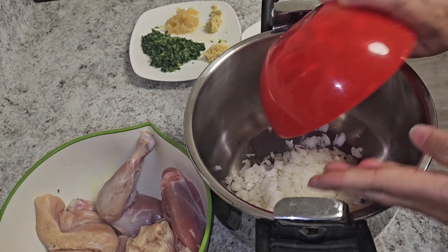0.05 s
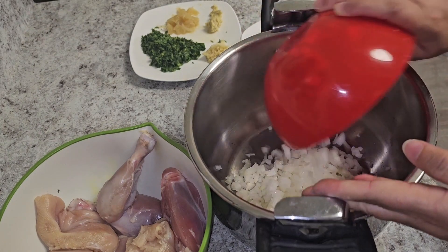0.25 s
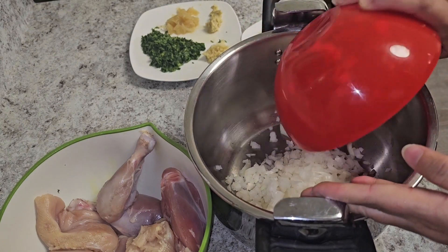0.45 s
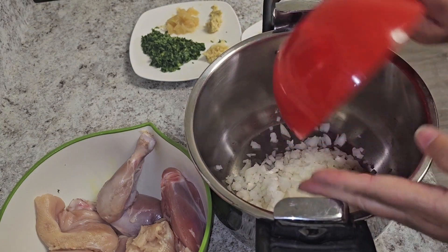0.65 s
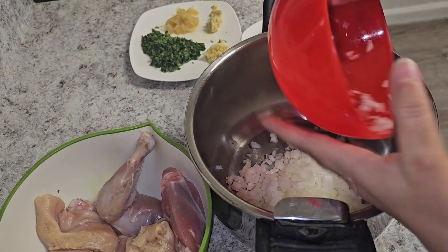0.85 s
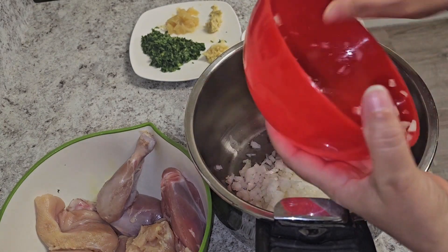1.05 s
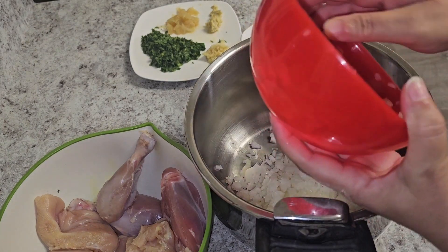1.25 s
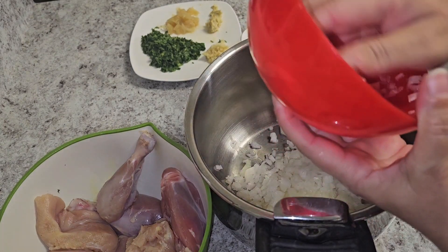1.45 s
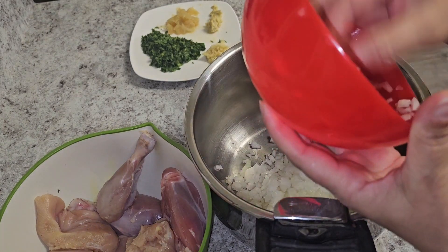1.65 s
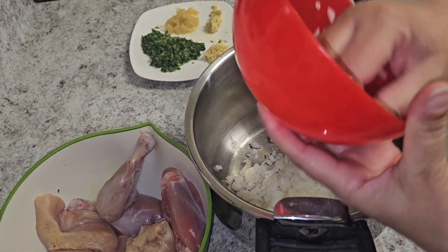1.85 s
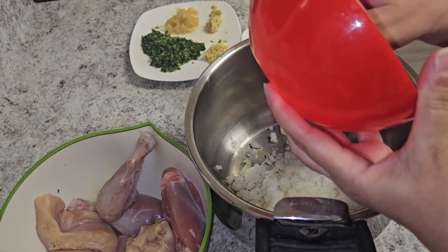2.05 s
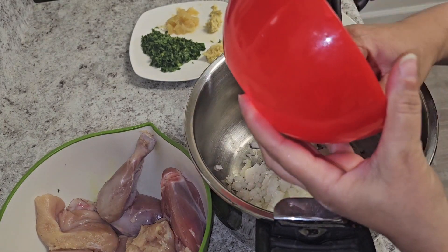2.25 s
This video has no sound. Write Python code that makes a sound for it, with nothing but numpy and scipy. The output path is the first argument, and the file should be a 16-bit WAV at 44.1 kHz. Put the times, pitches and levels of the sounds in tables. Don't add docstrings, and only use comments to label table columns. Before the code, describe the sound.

A plastic bowl knocks sharply on a steel pot rim, then fingers scrape out the last pieces

```python
import sys
import numpy as np
from scipy import signal
from scipy.fft import rfft, irfft
from scipy.io import wavfile

SR = 44100
rng = np.random.default_rng(int(sys.argv[2]) if len(sys.argv) > 2 else 0)


def put_to_file(sound):
    columns = np.atleast_2d(sound).T
    safe = np.clip(columns, -1, 1)
    whole_steps = np.round(safe * 32767)
    wavfile.write(sys.argv[1], SR, whole_steps.astype(np.int16))


def invert_db(x):
    u = np.asarray(x, float) / 20
    return 10 ** u


N = 101429
T = np.arange(N) / SR
HZ = np.fft.rfftfreq(2 ** 17, 1 / SR) + 1

# f/Hz, density/dB
KITCHEN_SPECTRUM = [(20, -11.5), (77, -5.5), (250, -14), (816, -21), (1050, -26), (9800, -34.5),
                    (10800, -42), (16000, -42.5)]
# f/Hz, width/Hz, level/dB rms
FRIDGE_HUM = [(117.5, 11, -56.5), (461, 7.8, -74), (804, 11, -69.5)]
# t/s, level/dB
WORKTOP_SHAKE = [(0.0, -47), (0.11, -63), (0.16, -44.5), (0.28, -43.5), (0.33, -38), (0.43, -44),
                 (0.46, -32), (0.69, -34), (0.82, -56), (1.5, -49), (1.54, -55), (1.71, -50), (1.8, -69),
                 (1.92, -46.5), (2.0, -66.5), (2.3, -58.5)]
# t/s, crack/dB, thud/dB re crack, boom/dB re crack
KNOCKS = [
    (0.042, -30, -13, -17),
    (0.14, -16, -13.5, -21),
    (0.297, -13, -14, -22),
    (0.446, -13.5, -13.5, -20.5),
    (0.582, -9.5, -15.5, -20.5),
]
# f/Hz, density/dB
CRACK_SPECTRUM = [(530, -23), (900, -5), (1220, -8.5), (2330, -10), (3150, -5), (6390, -12.5), (7760, -9.5),
                  (15300, -16.5), (16500, -21)]
# f/Hz, level/dB, t60/s
BOWL_MODES = [(1540, -5.5, 0.034), (1738, -8.5, 0.13), (3000, -3, 0.044), (3145, -1.5, 0.075),
              (3510, 2, 0.023), (4220, 1.5, 0.012), (5000, -2, 0.011), (5860, -9, 0.049), (7680, 1, 0.084),
              (9500, -6, 0.025), (12000, -15, .02)]
# f/Hz, level/dB, t60/s
POT_MODES = [(230, -0.5, 0.08), (273.6, 1.5, 0.078), (349.8, -4.5, 0.26), (403.7, 0, 0.12), (539, -1, .07),
             (594, -12, 0.091), (681.5, -9.5, 0.32), (721.5, -7.5, 0.51), (895.5, -5.5, 0.19),
             (930, 0.5, 0.074), (1032, -6, 0.067)]
# f/Hz, level/dB, t60/s
WORKTOP_MODES = [(99.2, -3.5, 0.39), (133.5, -3, 0.32), (161, -3.5, 0.26), (198.5, 0.5, 0.19)]
# f/Hz, level/dB, t60/s
BASE_FLEX = [
    (302, -37.5, 0.055),
    (255.3, -23.5, 0.13),
    (187, -26, 0.16),
    (200.2, -18, 0.14),
    (242, -26.5, 0.12),
]
# t/s, level/dB
BUMPS = [
    (.045, -37),
    (0.684, -39),
    (1.019, -52.5),
    (1.28, -43.5),
    (1.43, -54),
    (1.89, -45),
    (2.09, -48),
]
# t/s, tick/dB, hollow/dB re tick, wall/dB re tick
TAPS = [(0.7247, -42, -5, -7), (0.8754, -54, -16.5, -6), (1.058, -50, -10, -8),
        (1.2822, -45.5, -7.5, -13.5), (1.5414, -38.5, -25, -29), (1.5698, -41, -13, -0.5),
        (1.7112, -67, 5.5, 18), (1.7885, -35, -8.5, -7), (1.8557, -36.5, -18, -28),
        (1.8859, -29.5, -11.5, -11), (2.0803, -37.5, -10, -28), (2.217, -43.5, -3, -2),
        (2.2501, -29, -14.5, -11.5)]
# f/Hz, level/dB, t60/s
WALL_MODES = [(950, -1, 0.016), (1340, 3, 0.015), (1910, -2, 0.014)]
# f/Hz, level/dB, t60/s
HOLLOW_MODES = [(140, -2, .06), (250, -1.5, 0.055), (488, -4, 0.058), (712, 2.5, 0.046), (812, 7.5, 0.09),
                (890, -9, 0.056)]
# f/Hz, density/dB
SKIN_SPECTRUM = [(1500, -49), (2500, -18), (3200, 1.5), (4500, -1), (6500, -7), (9500, -9.5), (11000, -10),
                 (16000, -14)]
# start t/s, rise/s, fall/s, rub/dB, squeak/dB re rub
STROKES = [
    (.98, 0.053, .03, -64.5, -4),
    (1.24, 0.06, .02, -64, -7),
    (1.36, 0.07, 0.16, -56, -10.5),
    (1.47, 0.15, 0.055, -60, -3),
    (1.849, 0.013, 0.078, -49.5, -25),
    (1.876, 0.038, 0.021, -54.5, 4),
    (2.077, 0.0036, 0.045, -53, -9.5),
    (2.10, .11, 0.046, -52.5, 1),
    (2.24, 0.013, 0.076, -57, -3),
]
# f/Hz, t60/s
ROOM_DECAY = [(60, 0.62), (250, 0.49), (1000, 0.29), (4000, 0.35), (12000, 0.29)]
# f/Hz, left re right/dB, unlike share/0-1
STEREO = [(59, 2.5, 0.1), (298, 2, 0.37), (710, 3.2, 0.84), (2400, 2, 0.97), (5000, 6, .95),
          (9400, 2.7, 0.89), (14400, 6.5, 0.83)]

KITCHEN_DB = -53
SHAKE_HZ, SHAKE_DB = 60.1, -0.5
CRACK_S, CRACK_DB, RATTLE_S, RATTLE_DB = 0.00043, 2, 0.0033, -20
THUD_S, THUD_DB, BOOM_S, BOOM_DB = 0.00042, 5.5, 0.0014, 9.5
THUMP_HZ, THUMP_DB, THUMP_S = 218, 1.5, 0.032
RING_DB, FLEX_RISE_S, LATE_S = -6.5, 0.006, 0.0007
PUSH_SCATTER = 0.2
TICK_S, TICK_DB, HOLLOW_DB, WALL_DB = 0.0008, 4, 7.5, 9
SLIPS_PER_S, SLIP_DB, SQUEAK_HZ = 9000, 2.2, 1510
DIRECT_DB, BODY_SEND_DB, EARLY_S, TAIL_RISE_S = -1.5, -11, 0.0043, 0.0043
KNOCK_TAIL_DB, KNOCK_EARLY_DB = 3.5, 5
FINGER_TAIL_DB, FINGER_EARLY_DB = -4.5, -10
TOP_HZ = 15900


def spec(x):
    return rfft(x, 2 * len(HZ) - 2)


def shape(x, g):
    return irfft(spec(x) * g)[..., :N]


def read(table, col=1):
    a = np.array(table, float)
    return np.interp(np.log(HZ), np.log(a[:, 0]), a[:, col])


def colour(x, table):
    g = invert_db(read(table))
    return shape(x, g / np.sqrt(np.mean(g ** 2)))


def band(x, hz, width_hz, order=1):
    g = 1 / (1 + 1j * (HZ - hz ** 2 / HZ) / width_hz) ** order
    return shape(x, g / np.sqrt(np.mean(abs(g) ** 2)))


def ring(x, modes):
    out = 0
    for k, (hz, db, t60_s) in enumerate(modes):
        pole = np.exp(2j * np.pi * hz / SR - np.log(1000) / (t60_s * SR))
        out = out + (-1) ** k * invert_db(db) * signal.lfilter([1], [1, -pole], x + 0j).imag
    return out / np.sqrt(sum(invert_db(2 * mode[1]) for mode in modes))


def decays(times_s, db, decay_s):
    return sum(invert_db(d) * (T >= s) * np.exp(-np.maximum(T - s, 0) / decay_s) for s, d in zip(times_s, db))


def bursts(times_s, db, decay_s):
    return decays(times_s, db, decay_s) * rng.standard_normal(N)


def push(times_s, db, decay_s):
    decay_n = decay_s * SR
    ragged = 1 / decay_n + PUSH_SCATTER * rng.standard_normal(N) / np.sqrt(decay_n)
    return decays(times_s, db, decay_s) * ragged


def walk(rate_hz):
    w = shape(rng.standard_normal(N), 1 / (1 + ((HZ - 1) / rate_hz) ** 2))
    return w / w.std()


def ports(a, b):
    share = np.clip(read(STEREO, col=2), 0, 1)
    tilt = invert_db(read(STEREO) / 2)
    mid, side = spec(a), share * spec(b)
    pair = np.array([(mid + side) * tilt, (mid - side) / tilt])
    return irfft(pair / np.sqrt(1 + share ** 2))[:, :N]


def room(x, body, tail_db, early_db):
    noise = rng.standard_normal((2, 2, N))
    decay = np.array(ROOM_DECAY)
    tail = 0
    for hz in 45 * 2 ** np.arange(9.):
        t60_s = np.interp(np.log(hz), np.log(decay[:, 0]), decay[:, 1])
        octave = np.cos(np.pi / 2 * np.clip(np.log2(HZ / hz), -1, 1)) ** 2
        tail = tail + shape(noise[0], octave) * invert_db(-60 * T / t60_s)
    tail = tail * np.minimum(T / TAIL_RISE_S, 1)
    tail = invert_db(tail_db) * tail / np.sqrt(np.mean(np.sum(tail ** 2, axis=1)))
    early = noise[1] * np.exp(-T / EARLY_S) * invert_db(early_db) / np.sqrt(EARLY_S * SR / 2)
    wet = shape(x + invert_db(BODY_SEND_DB) * body, spec(tail)) + shape(x, spec(early))
    direct = x * invert_db(DIRECT_DB) + body
    near = signal.lfilter([0, 0, .5, -.5, 0, .5, 0, 0, -.5], 1, direct)
    return ports(direct + wet[0], near + wet[1])


def kitchen():
    pair = []
    for _ in range(2):
        x = colour(rng.standard_normal(N), KITCHEN_SPECTRUM) * invert_db(KITCHEN_DB + 1.7 * walk(2.2))
        for hz, width_hz, db in FRIDGE_HUM:
            x = x + invert_db(db + 1.9 * walk(6.9)) * band(rng.standard_normal(N), hz, width_hz)
        pair.append(x)
    return ports(*pair)


def shake():
    s, db = np.array(WORKTOP_SHAKE).T
    phase = 2 * np.pi * np.cumsum(SHAKE_HZ * (1 + 0.09 * walk(9.34))) / SR
    level = invert_db(np.interp(T, s, db) + SHAKE_DB + 2.15 * walk(10))
    return np.sqrt(2) * np.sin(phase) * level


def knocks():
    s, db, thud, boom = np.array(KNOCKS).T
    s = s + LATE_S
    snap = push(s, db + CRACK_DB + 9, CRACK_S / 20)
    rattle = bursts(s, db + RATTLE_DB, RATTLE_S)
    crack = colour(snap + rattle, CRACK_SPECTRUM)
    thump = band(bursts(s, db + thud + THUMP_DB - 2.5, THUMP_S), THUMP_HZ, 417, order=2)
    bowl = ring(push(s, db + RING_DB - 1.5, CRACK_S / 10), BOWL_MODES)
    low = ring(push(s, db + boom + BOOM_DB, BOOM_S), WORKTOP_MODES)
    for at, (hz, flex_db, t60_s) in zip(s, BASE_FLEX):
        age = np.maximum(T - at, 0)
        env = invert_db(flex_db - 60 * age / t60_s) * (1 - np.exp(-age / FLEX_RISE_S))
        low = low + env * np.sin(2 * np.pi * hz * age)
    pot = ring(push(s, db + thud + THUD_DB, THUD_S / 4), POT_MODES)
    return crack, thump + bowl + pot + low


def bumps():
    s, db = np.array(BUMPS).T
    return band(bursts(s, db, 0.011), 210, 253, order=2)


def taps():
    s, db, low, mid = np.array(TAPS).T
    contact = bursts(s, db + TICK_DB - 3, TICK_S) + bursts(s, db - 11, 0.0067)
    tick = colour(contact, SKIN_SPECTRUM)
    wall = ring(push(s, db + mid + WALL_DB - 3.5, 0.0001), WALL_MODES)
    hollow = ring(push(s, db + low + HOLLOW_DB, 0.00012), HOLLOW_MODES)
    return tick, wall + hollow


def rub():
    slips = (rng.random(N) < SLIPS_PER_S / SR) * rng.standard_normal(N)
    slips = slips * invert_db(SLIP_DB * rng.exponential(size=N).clip(max=3))
    slips = slips / slips.std() * invert_db(2.5 * walk(42))
    hiss = squeak = 0
    for s, rise_s, fall_s, db, squeak_db in STROKES:
        swell = np.sin(np.pi / 2 * np.clip((T - s) / rise_s, 0, 1)) ** 2
        fade = np.exp(-(np.maximum(T - s - rise_s, 0) / fall_s) ** 2)
        env = invert_db(db) * swell * fade
        hiss = hiss + env
        squeak = squeak + env * invert_db(squeak_db)
    return colour(slips * hiss, SKIN_SPECTRUM) + band(slips * squeak, SQUEAK_HZ, 2200, order=2)


def scene():
    tick, hollow = taps()
    fingers = room(tick + rub() + bumps(), hollow, FINGER_TAIL_DB, FINGER_EARLY_DB)
    crack, body = knocks()
    blows = room(crack, body, KNOCK_TAIL_DB, KNOCK_EARLY_DB)
    worktop = ports(shake(), 0 * T)
    return blows + fingers + worktop + kitchen()


def top_cut(x):
    return signal.sosfilt(signal.butter(12, 16820, fs=SR, output="sos"), x)


def record(dry):
    mix = signal.sosfilt(signal.ellip(8, 0.2, 60, TOP_HZ, fs=SR, output="sos"), dry)
    return top_cut(mix)


dry = scene()
out = record(dry)
put_to_file(out)
```